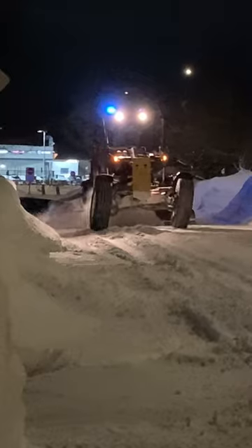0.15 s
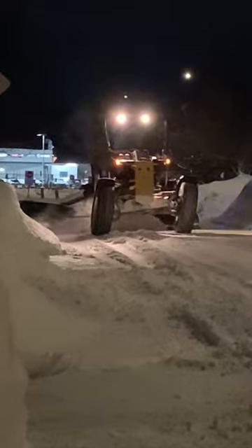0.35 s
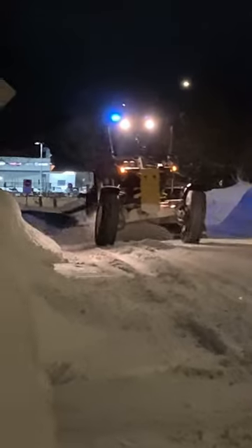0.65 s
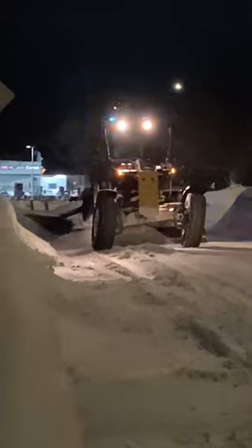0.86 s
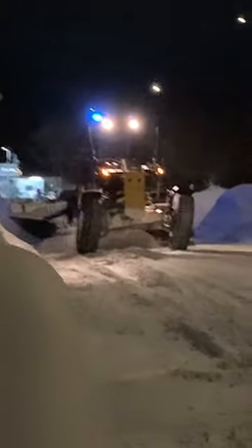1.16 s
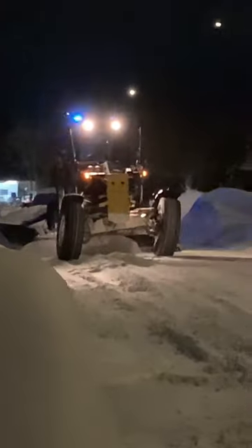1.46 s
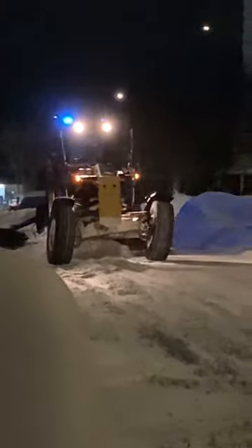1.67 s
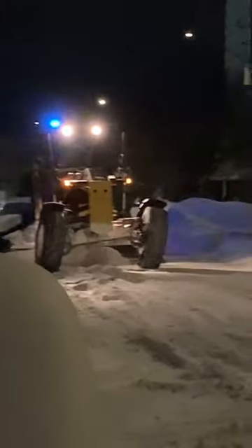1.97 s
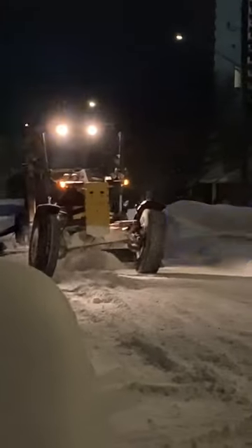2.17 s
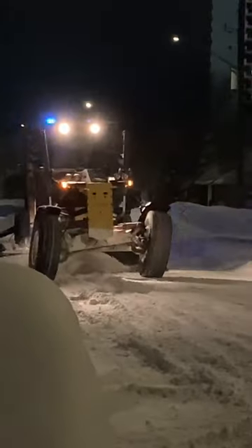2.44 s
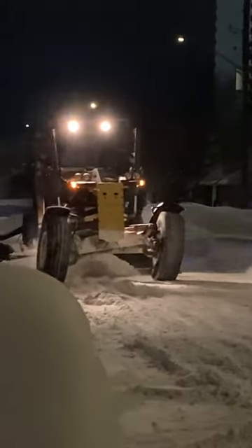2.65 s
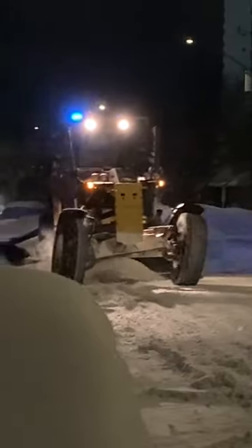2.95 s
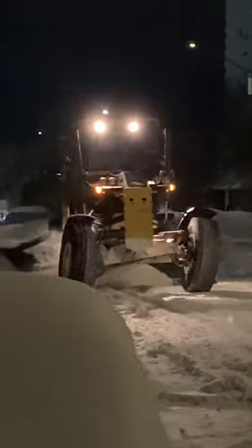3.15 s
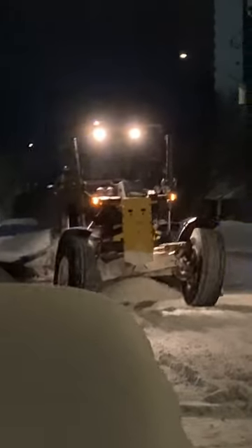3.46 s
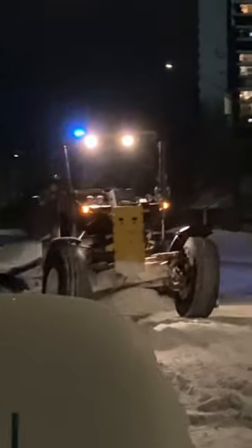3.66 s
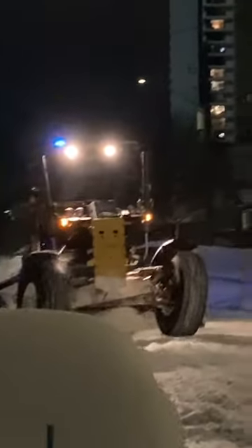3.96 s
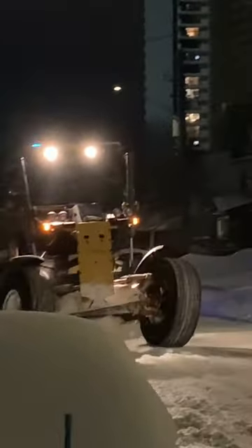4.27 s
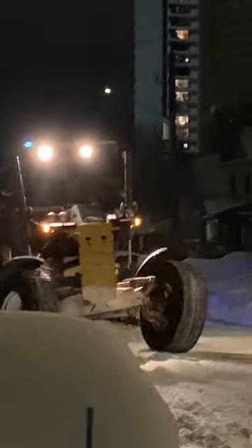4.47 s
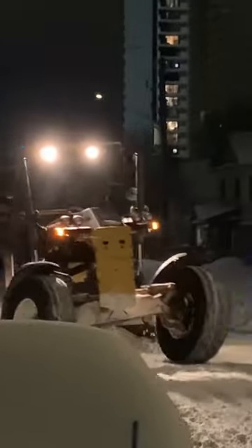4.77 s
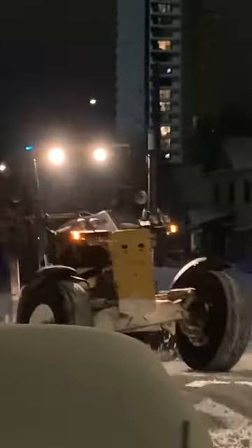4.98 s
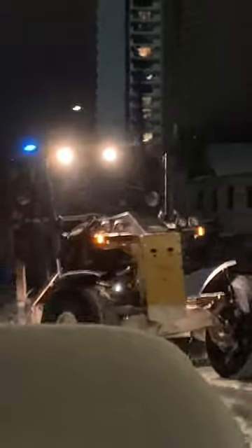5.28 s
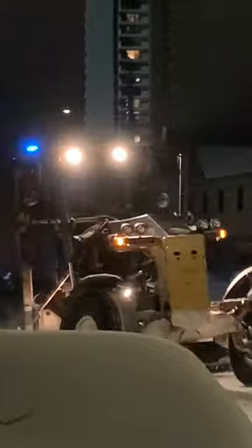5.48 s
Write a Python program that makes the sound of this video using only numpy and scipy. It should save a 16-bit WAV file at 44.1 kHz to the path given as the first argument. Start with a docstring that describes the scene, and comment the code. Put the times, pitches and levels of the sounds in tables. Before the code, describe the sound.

Low, rough diesel throbbing and a blade grinding packed snow move toward a nearby handheld stereo microphone. Dull metal knocks and crunching lumps come irregularly, with a faint ring off house fronts. Hiss, fan hum and thin high whine build; around four seconds the engine eases down, the turbo gives a brief breathy whistle and slides lower, and clanks cluster as the machine arrives.

```python
"""A diesel road grader booms, scrapes and clanks nearer along a snowy street; late on, its revs and turbo wind down.
Exhaust: tones and gas puffs at the firing rate. Fan, gears, hydraulics, turbo: noise bands, most geared to the engine.
Blade: coloured noise, fracture grains and ringing chunks. Clanks: steel modes and cracking snow; chips: noise bursts.
House fronts add a diffuse ring to the hits; two closely spaced microphone ports shape the stereo image."""
import sys
import numpy as np
from scipy import signal
from scipy.fft import rfft, irfft, next_fast_len
from scipy.io import wavfile
from scipy.ndimage import uniform_filter1d, map_coordinates

SR = 44100
rng = np.random.default_rng(int(sys.argv[2]) if len(sys.argv) > 2 else 0)


def put_to_file(sound):
    """Save the sound as 16-bit audio at rate SR, in the file named by the first command-line argument."""
    columns = np.atleast_2d(sound).T  # one column per channel
    safe = np.clip(columns, -1, 1)
    whole_steps = np.round(safe * 32767)
    wavfile.write(sys.argv[1], SR, whole_steps.astype(np.int16))


N = 247842

CRUISE_HZ = 82.9  # firing rate while plowing steadily


def amp(db):
    """Decibels to gain."""
    return 10 ** (np.asarray(db) / 20)


def unit(x):
    """Scaled to rms 1."""
    return x / np.sqrt(np.mean(x ** 2) + 1e-20)


def along(points, hz):
    """(frequency [Hz], value) points read on a log frequency axis."""
    f, v = np.transpose(points)
    return np.interp(np.log(hz + 1), np.log(f + 1), v)


def curves(rows):
    """One value per sample for each column after the time."""
    s, *cols = np.transpose(rows)
    return [np.interp(np.arange(N) / SR, s, c) for c in cols]


def wobble(rate_hz):
    """A smooth random curve with rate_hz knots a second."""
    knots = rng.standard_normal(int(N * rate_hz / SR) + 4)
    return map_coordinates(knots, [np.arange(N) * rate_hz / SR])


def swells(rows):
    """Smooth bumps in dB, one for each (start [s], length [s], change [dB]) row."""
    t = np.arange(N) / SR
    return sum(db * np.exp(-(2 * (t - s) / length - 1) ** 2) for s, length, db in rows)


def nearness_db():
    """Level gained as the grader rolls straight towards the listener, by inverse distance."""
    start_m, speed_m_per_s = 13.2, 1.62
    distance_m = np.maximum(start_m - speed_m_per_s * np.arange(N) / SR, 1)
    return 20 * np.log10(start_m / distance_m)


def filtered(x, response):
    """x times a response of frequency."""
    n = x.shape[-1]
    m = next_fast_len(n + SR // 10)
    return irfft(rfft(x, m) * response(np.fft.rfftfreq(m, 1 / SR)), m)[..., :n]


def coloured(x, spectrum):
    """x weighted by (frequency [Hz], gain [dB]) points, at rms 1."""
    return unit(filtered(x, lambda hz: amp(along(spectrum, hz))))


def spread(pair):
    """Two unrelated signals become left and right, their likeness set by frequency."""
    # likeness of the two ports: (frequency [Hz], correlation [-1..1])
    alike = [(60, 0.93), (130, 0.98), (290, 0.96), (640, 0.81), (1400, 0.35), (3000, 0.43), (6500, 0.15),
             (8000, 1), (15000, 1)]

    def mid_side_gains(hz):
        angle = np.arccos(np.clip(along(alike, hz), -1, 1)) / 2
        return np.array([np.cos(angle), np.sin(angle)])

    mid, side = filtered(pair, mid_side_gains)
    return unit(np.array([mid + side, mid - side]))


def narrow(centre_hz, width_hz):
    """A stereo band of turbulent noise riding on a given pitch."""
    hiss = filtered(rng.standard_normal((2, 2, N)), lambda hz: 1 / (1 + (hz / width_hz) ** 2.25))
    phase = 2 * np.pi * np.cumsum(centre_hz) / SR
    return spread(hiss[0] * np.cos(phase) + hiss[1] * np.sin(phase))


def grains(rate_hz, scatter_db, size=N):
    """Two trains of tiny fractures of random size, at rms 1."""
    hit = rng.random((2, size)) < rate_hz / SR
    scatter = amp(scatter_db * np.clip(rng.standard_normal((2, size)), -2, 2))
    return unit(hit * rng.standard_normal((2, size)) * scatter)


def patchy(x, depth_db):
    """Random gain patches in time and pitch: each clump of snow has its own colour."""
    z = signal.stft(x, nperseg=1024)[2]
    field = uniform_filter1d(rng.standard_normal(z.shape[1:]), size=4, axis=0)
    field = uniform_filter1d(field, size=9, axis=1)
    return signal.istft(z * amp(depth_db * unit(field)), nperseg=1024)[1][:, :N]


def add(track, s, sound):
    """Mix a short sound in at time s."""
    start = max(round(s * SR), 0)
    part = track[..., start:start + sound.shape[-1]]
    part += sound[..., :part.shape[-1]]


def exhaust(firing_hz, firings):
    """A deep boom at the firing rate, and uneven puffs of gas ringing the muffler."""
    # boom sags as the throttle closes, swells at the lower revs: (time [s], level [dB])
    boom_curve = [(0, -28.3), (.45, -29), (1.1, -25), (1.8, -22.5), (2.4, -23.5), (3.9, -23), (4.18, -32.5),
                  (4.45, -27), (4.78, -26.5), (5.27, -18.5), (5.62, -19)]
    # brief dips of the boom: (start [s], length [s], change [dB])
    falters = [(.7, 0.052, -5), (2.565, .06, -3.5), (3.65, 0.039, -6.5)]
    # rumble swells as the engine labours: (start [s], length [s], rise [dB])
    lugs = [(.68, 0.37, 2), (2.62, 0.27, 5), (4.2, 0.43, 5)]
    # tones at 1.5, 2 and 2.5 times the firing rate: level against the rumble [dB]
    order_levels_db = [-17.5, -22.5, -17]
    # third harmonic droning in the muffler: (time [s], level [dB])
    drone_curve = [(0, -44.5), (1.5, -45.5), (1.9, -39.5), (2.4, -47.5), (2.85, -37), (3.3, -46),
                   (5.62, -54)]
    # relative firing strength of the six cylinders
    cylinders = [0.82, 1.1, 1.3, 2.07, 0.53, 0.23]
    # muffler colour: (frequency [Hz], relative level [dB])
    pipe = [(20, -41), (40, -12), (62, 1.5), (100, 7), (120, -7.5), (145, -1.5), (200, -5), (222, -8.5),
            (255, -1.5), (305, -4.5), (370, -25), (700, -42), (2000, -90.5)]
    rumble_base_db, rumble_waver_db = -33.5, 0.17
    hollow_cruise_db, hollow_db_per_hz = -5.5, 0.15  # against the rumble

    boom_db, = curves(boom_curve)
    boom_db = boom_db + swells(falters)
    rumble_db = rumble_base_db + rumble_waver_db * wobble(11) + swells(lugs)
    phase = 2 * np.pi * firings
    # unequal manifold halves give weak in-between orders, each wavering by itself
    overtones = sum(amp(db + 4.0 * wobble(6)) * np.sin(k * phase + .5 * wobble(6.6))
                    for k, db in zip(np.arange(3, 6) / 2, order_levels_db))
    drone = amp(curves(drone_curve)[0]) * narrow(3 * firing_hz, width_hz=4.7)
    boom = np.sqrt(2) * (np.sin(phase) * amp(boom_db) + amp(rumble_db) * overtones) + drone

    count = firings.astype(int)
    strength = np.take(cylinders, count % len(cylinders)) * amp(3.3 * rng.standard_normal(N))
    puffs = np.diff(count, prepend=0) * strength
    gas = rng.standard_normal((2, N)) * (1 + 0.67 * np.cos(phase))
    rumble = amp(-1.5) * spread(coloured(gas, pipe)) + amp(-6.0) * coloured(puffs, pipe)
    # the muffler's hollow ring fades as the revs fall
    hollow_db = hollow_cruise_db + hollow_db_per_hz * (firing_hz - CRUISE_HZ)
    hollow = amp(hollow_db) * narrow(np.full(N, 146), width_hz=27.4)
    return (boom + amp(rumble_db) * (rumble + hollow)) * amp([[.1], [-.1]])


def chunks():
    """Frozen chunks knock on the mouldboard, each with a short ring of its own pitch."""
    rate_hz, scatter_db = 70, 2
    middle_hz, spread_octaves, decay_cycles = 907, .6, 17.5
    track, t = np.zeros((2, N)), np.arange(SR // 12) / SR
    draws = np.clip(rng.standard_normal((int(rate_hz * N / SR), 3)), -2, 2)
    for k, (size, pitch, place) in enumerate(draws):
        cycles = middle_hz * 2 ** (spread_octaves * pitch) * t
        stereo_phase = place * np.array([[.5], [-.5]])
        ring = np.sin(2 * np.pi * cycles + stereo_phase) * np.exp(-cycles / decay_cycles)
        add(track, (k + 2 * rng.random()) / rate_hz, amp(scatter_db * size) * ring)
    return unit(track)


def blade(firing_hz, firings):
    """The edge grinds packed snow in small jerks, shaken by the engine; snow crumbles and slides off."""
    # bite into the snow: (time [s], relative grind level [dB], relative scrape level [dB])
    bite = [(0, -50, -45), (.68, -48, -49), (.95, -44, -44), (1.55, -45.5, -47), (2.2, -41.5, -42),
            (2.55, -42, -44), (3.8, -38.5, -42), (4.3, -38.5, -42.5), (4.8, -40.5, -48.5),
            (5.62, -39, -43.5)]
    # low grinding colour: (frequency [Hz], relative level [dB])
    grind_colour = [(150, -7.5), (300, 1), (430, -4.5), (570, -0.5), (720, -3), (950, -10.5), (2000, -33.5),
                    (5000, -78.5)]
    # scrape colour: (frequency [Hz], relative level [dB])
    scrape_colour = [(300, -26), (700, -4), (950, 0.5), (1200, -5), (1500, -5), (1900, -13), (3000, -20),
                     (6000, -41.5), (12000, -85.5)]
    # heaps spilling off the blade: (start [s], length [s], hiss rise [dB])
    spills = [(.34, 0.08, 7), (.82, 0.2, 3.5), (1.35, 0.33, 7.5), (1.72, 0.44, 6.5), (2.4, 0.49, 3),
              (2.942, 0.31, 6.5), (3.5, 0.74, 4), (4.3, 0.11, 6), (4.94, 0.1, 7), (5.27, 0.23, 5)]
    # sliding snow colour: (frequency [Hz], relative level [dB])
    snow_colour = [(900, -21), (2000, 0.5), (2600, 2), (3300, 2), (4600, 1), (5600, -7.5), (6500, -10),
                   (8000, -12.5), (12000, -54)]
    # finest spray: (time [s], level [dB])
    spray = [(0, -78), (1.3, -69), (1.45, -64), (2.4, -62.5), (3.9, -58.5), (4.5, -62.5), (4.85, -64),
             (5.35, -54), (5.62, -54.5)]
    # spray colour: (frequency [Hz], relative level [dB])
    fizz_colour = [(3000, -34), (6500, -1.5), (8500, -9), (9800, 1), (11000, -1.5), (13300, -4),
                   (15500, -8.5)]
    # coarse lumps crumbling ahead of the blade: (time [s], level [dB])
    lump_curve = [(0, -71), (1.4, -73), (1.95, -54.5), (2.55, -57), (3.03, -46), (3.4, -64), (3.75, -53),
                  (4.15, -57.5), (4.8, -56.5), (5, -50), (5.15, -66.5), (5.45, -54.5)]
    # lump colour: (frequency [Hz], relative level [dB])
    lump_colour = [(1200, -32), (1650, 6.5), (1880, 0), (2200, -3), (2600, -4), (3100, -3), (3600, -14.5),
                   (6000, -27)]
    hiss_start_db, hiss_db_per_hz = -60, 0.27  # at the starting distance; less at low revs

    grind_db, scrape_db = curves(bite)
    shake = 1 + 0.042 * np.cos(2 * np.pi * firings)
    jerks = amp(0.84 * wobble(14) + 0.42 * wobble(70)) * shake
    grind = spread(coloured(rng.standard_normal((2, N)) * jerks, grind_colour))
    scratches = patchy(grains(rate_hz=2000, scatter_db=0.0) * jerks, depth_db=2.5)
    scrape = amp(-0.9) * spread(coloured(scratches, scrape_colour)) + amp(-8.5) * chunks()
    body = (amp(grind_db + 2.0) * grind + amp(scrape_db) * scrape) * amp([[1.1], [-1.1]])

    hiss_db = hiss_start_db + nearness_db() + hiss_db_per_hz * (firing_hz - CRUISE_HZ) + swells(spills)
    crumbs = rng.standard_normal((2, N)) + 0.43 * grains(rate_hz=400, scatter_db=5.5)
    crumbs = patchy(crumbs, depth_db=3.5)
    hiss = amp(hiss_db) * spread(coloured(crumbs, snow_colour)) * amp([[-1.1], [1.1]])
    fizz = amp(curves(spray)[0] + 1.9 * wobble(30)) * spread(coloured(crumbs, fizz_colour))
    crumbling = patchy(grains(rate_hz=1300, scatter_db=2.5), depth_db=4.0)
    lumps = amp(curves(lump_curve)[0]) * spread(coloured(crumbling, lump_colour))
    return body + hiss + fizz + lumps


def drive(firing_hz):
    """Hydraulics, gears and fan whirr as noise bands geared to the engine; a low tone wavers on its own pitch."""
    # hydraulics under load: (time [s], level [dB])
    pump_curve = [(0, -63.5), (2.5, -66), (3, -52.5), (3.35, -56), (3.9, -53), (4.7, -60)]
    # gear whines: (multiple of the firing rate, relative level [dB])
    gear_orders = [(20.4, 1.5), (26.05, -4), (30.3, -7)]
    # cooling fan, heard once the machine's flank shows: (time [s], level [dB])
    fan_curve = [(0, -65), (2.2, -58.5), (2.8, -44.5), (3.7, -41), (4.35, -41.5), (4.8, -45), (5.62, -43)]
    # low wavering tone near 200 Hz, drifting upward: (time [s], pitch [Hz], level [dB])
    low_tone_curve = [(0, 197.7, -43.5), (1.1, 194.3, -49.5), (1.5, 194.1, -39), (2.05, 209, -41),
                      (2.6, 209.7, -60), (3.65, 228, -42), (4.3, 245, -59)]
    gears_start_db, gears_db_per_hz = -62.5, 0.13  # at the starting distance; fades as the revs fall

    pump_db, = curves(pump_curve)
    fan_db, = curves(fan_curve)
    low_tone_hz, low_tone_db = curves(low_tone_curve)
    pump = amp(pump_db) * narrow(26.6 * firing_hz, width_hz=180)
    mesh = sum(amp(db + 2.2 * wobble(2.01)) * narrow(order * firing_hz, width_hz=23)
               for order, db in gear_orders)
    gears_db = gears_start_db + nearness_db() + gears_db_per_hz * (firing_hz - CRUISE_HZ)
    fan = amp(fan_db) * narrow(3.9 * firing_hz, width_hz=29.0)
    low_tone = amp(low_tone_db) * narrow(low_tone_hz, width_hz=9.8)
    return pump + amp(gears_db) * mesh + fan + low_tone


def turbo(firing_hz):
    """A thin blade whine and a breathy whistle on one shaft, over the hiss of the air intake."""
    # spools up under load, then runs down: (time [s], whine pitch [Hz], whistle level [dB])
    shaft = [(0, 9250, -82), (.8, 9360, -68), (1.5, 9590, -59), (2.2, 9850, -58), (3, 10140, -60.5),
             (3.6, 10360, -63), (3.97, 10340, -65), (4.13, 10050, -58.5), (4.275, 9830, -42.5),
             (4.42, 9030, -55), (4.52, 8670, -71), (4.72, 8170, -58), (4.95, 7660, -54), (5.3, 7640, -49.5),
             (5.62, 7780, -53)]
    whine_full_db, whine_full_hz, whine_db_per_hz = -63, 10240, 0.0196  # fades below full spool
    whine_rise_s, whistle_ratio = 1, 1.549  # whistle pitch over whine pitch
    intake_start_db, intake_db_per_hz = -65.5, 0.3  # at the starting distance; fades as the revs fall

    whine_hz, whistle_db = curves(shaft)
    whine_db = whine_full_db + whine_db_per_hz * (whine_hz - whine_full_hz)
    emerging = np.minimum(np.arange(N) / SR / whine_rise_s, 1)
    whine = emerging * amp(whine_db + 1.8 * wobble(21.98)) * narrow(whine_hz, width_hz=115)
    whistle = amp(whistle_db + 2.3 * wobble(25)) * narrow(whistle_ratio * whine_hz, width_hz=245)
    intake_db = intake_start_db + nearness_db() + intake_db_per_hz * (firing_hz - CRUISE_HZ)
    intake = amp(intake_db + 2.8 * wobble(14)) * narrow(np.full(N, 14760), width_hz=260)
    return whine + whistle + intake


def clanks():
    """Slack joints slam and packed snow cracks as the blade meets ridges; snow damps the steel."""
    # blade and frame hits: (time [s], relative level [dB], favoured pitch [Hz], rattle length [s])
    blows = [(.102, -33.5, 1120, 0.017), (.319, -33, 1420, 0.06), (.437, -30.5, 900, .016),
             (.741, -21, 1500, 0.007), (.767, -29, 1550, 0.011), (.825, -29, 910, .035),
             (.895, -28, 1130, .025), (1.009, -30, 1000, 0.03), (1.135, -32, 680, .03),
             (1.19, -29, 1100, .03), (1.588, -32, 560, .004), (1.879, -26.5, 940, 0.043),
             (2.051, -22.5, 1080, 0.02), (2.282, -26, 1290, .012), (2.304, -27, 680, 0.007),
             (2.665, -24, 930, .006), (3.292, -27.5, 1100, 0.029), (3.344, -29, 1300, 0.015),
             (3.439, -36, 635, 0.0045), (3.564, -25.5, 814, .018), (3.853, -22, 970, .008),
             (4.1, -34, 600, .005), (4.195, -18, 910, 0.017), (4.216, -17, 590, .006),
             (4.332, -24, 1300, 0.034), (4.394, -25, 809.7, 0.017), (4.447, -24.5, 560, 0.0088),
             (4.566, -30, 1670, 0.041), (4.6, -23, 696, 0.026), (4.854, -33.5, 600, .005),
             (4.885, -26, 800, 0.02), (5.067, -24, 850, .012), (5.093, -22, 670, 0.0065),
             (5.329, -27, 560, 0.0116), (5.383, -27, 700, .01), (5.425, -22, 1450, .01),
             (5.493, -21, 580, .008), (5.506, -24.5, 1220, 0.01197)]
    # nominal steel modes: (frequency [Hz], relative level [dB], t60 [s])
    steel = [(590.6, 7.5, 0.14), (694, 0.5, 0.22), (858, 4.5, 0.12), (956, -1, 0.087), (1060, -8, 0.15),
             (1143, 5, 0.15), (1336, -3, 0.13), (1497, 8.5, 0.11), (1667, 4, 0.17), (1800, -5, 0.2)]
    # crunch colour: (frequency [Hz], relative level [dB])
    crunch_colour = [(100, -49), (300, -10.5), (580, 7), (1000, 2.5), (1500, -4.5), (1800, -5.5),
                     (2150, -11.5), (3200, -16), (6000, -34), (14000, -59)]
    attack_s, crunch_t60_s = 0.00068, 0.17
    focus_db, focus_octaves = 8, 0.31  # the place of contact favours modes around one pitch

    track, t = np.zeros((2, N)), np.arange(SR // 3) / SR
    for s, db, ring_hz, length_s in blows:
        ring = 0
        for mode_hz, level_db, t60_s in steel:
            decay = amp(level_db + rng.normal(0, 2.2) - 60 * t / t60_s)
            cycles = mode_hz * rng.normal(1, 0.02) * t + rng.random()
            ring = ring + decay * np.sin(2 * np.pi * (cycles + rng.normal(0, 0.042, (2, 1))))
        # the crust keeps cracking for a moment after the first contact
        rattle = amp(-60 * np.maximum(t - length_s, 0) / crunch_t60_s)
        cracks = grains(rate_hz=900, scatter_db=1.0, size=len(t)) + 0.91 * rng.standard_normal((2, len(t)))
        crunch = spread(coloured(cracks, crunch_colour)) * rattle
        blow = (amp(-11) * ring + crunch) * (1 - np.exp(-t / attack_s))

        def focus(hz):
            octaves = np.log2((hz + 1) / ring_hz)
            return amp(focus_db * np.exp(-.5 * (octaves / focus_octaves) ** 2))

        blow = filtered(blow, focus)
        add(track, s, amp(db - 11.5) * blow / np.std(blow[:, t < length_s + .01]))
    return track * amp([[.9], [-.9]])


def street(x):
    """Diffuse ring from house fronts: decaying noise whose t60 depends on frequency."""
    # ring of the street: (frequency [Hz], t60 [s])
    ring_t60 = [(200, 0.42), (1500, 0.72), (10000, 0.59)]
    hz, t, z = signal.stft(rng.standard_normal((2, SR // 2)), SR, nperseg=256)
    decay = amp(-60 * t / along(ring_t60, hz)[:, None])
    tail = signal.istft(z * decay, SR, nperseg=256)[1]
    return signal.fftconvolve(x, tail / np.linalg.norm(tail[0]), axes=1)[:, :N]


def chips():
    """Ice chips snap off the blade: short bright bursts of decaying noise."""
    # snaps: (time [s], relative level [dB])
    snaps = [(2.592, -44), (3.729, -45), (4.3264, -29), (4.73, -40.5), (5.286, -36.5)]
    track, t = np.zeros((2, N)), np.arange(SR // 10) / SR
    for s, db in snaps:
        snap = coloured(rng.standard_normal((2, len(t))), [(2000, -22), (4800, 16.5), (15000, -7)])
        add(track, s, amp(db - 11.5) * snap * amp(-60 * t / 0.052))
    return track


def scene():
    """The whole machine as it reaches the two ports, the case bending the sound on its way."""
    # engine speed: (time [s], firing rate [Hz])
    engine = [(0, 85.7), (.72, 85.94), (1.41, 83.42), (2.9, 83.1), (3.6, 82.57), (3.95, 80.42),
              (4.38, 69.95), (4.93, 64.38), (5.26, 63.25), (5.62, 63.5)]
    # phase between the ports: (frequency [Hz], left lead [rad])
    ports = [(0, 0), (1200, -0.1), (1700, -2), (2200, 0), (3500, 3.5), (4400, 1), (5400, 3), (6500, -1.13),
             (15600, -11.5)]
    firing_hz, = curves(engine)
    firings = np.cumsum(firing_hz) / SR
    machine = exhaust(firing_hz, firings) + blade(firing_hz, firings) + drive(firing_hz) + turbo(firing_hz)
    hits = clanks() + chips()
    grader = machine + hits + amp(-9.0) * street(hits)

    def port_phase(hz):
        lead_rad = np.interp(hz, *np.transpose(ports))
        return np.exp(.5j * lead_rad * np.array([[1], [-1]]))

    return filtered(grader, port_phase)


def record(dry):
    """Upper band limit: nothing sounds above top_hz."""
    top_hz = 15750
    return filtered(dry, lambda hz: hz < top_hz)


dry = scene()
out = record(dry)
put_to_file(out)
```